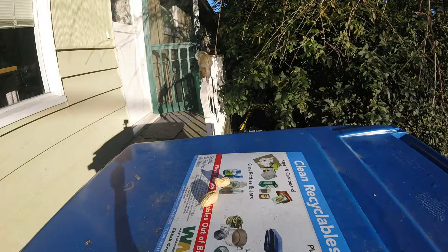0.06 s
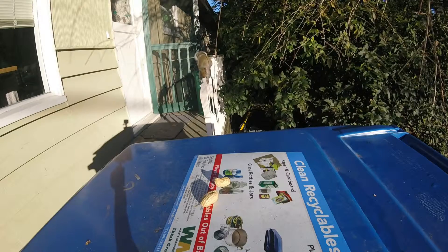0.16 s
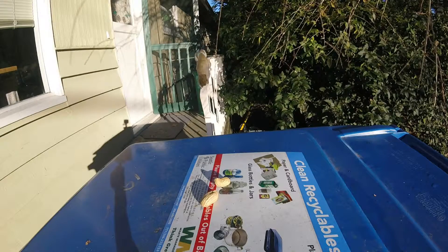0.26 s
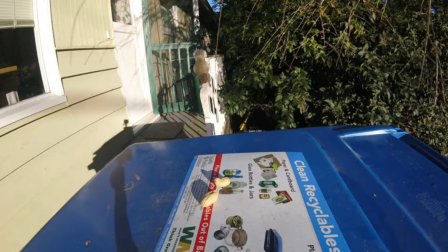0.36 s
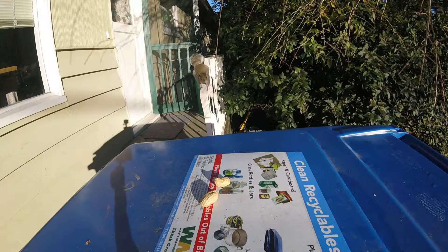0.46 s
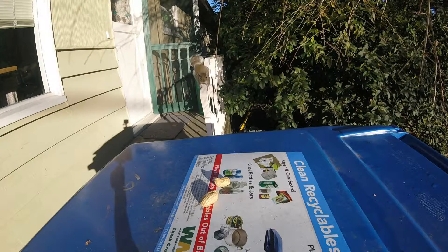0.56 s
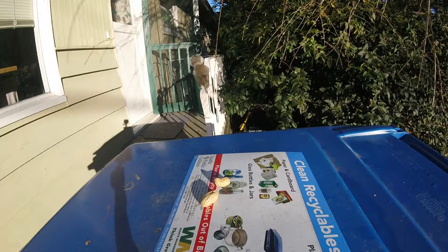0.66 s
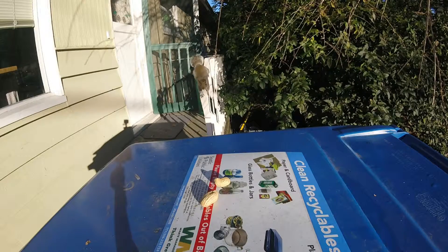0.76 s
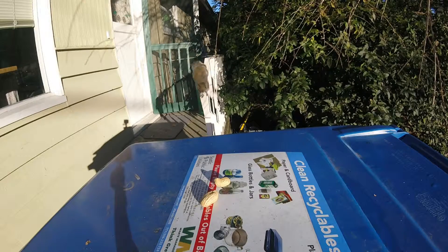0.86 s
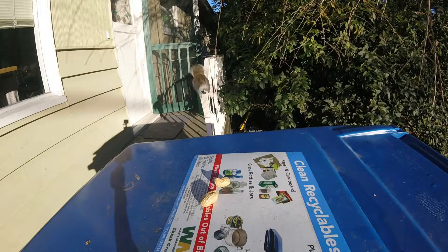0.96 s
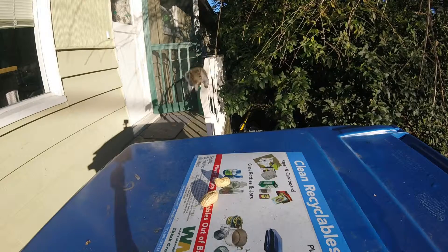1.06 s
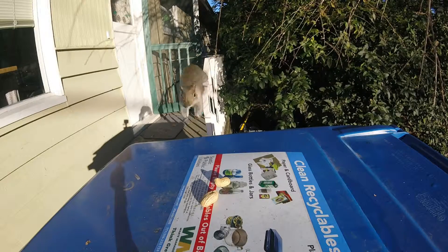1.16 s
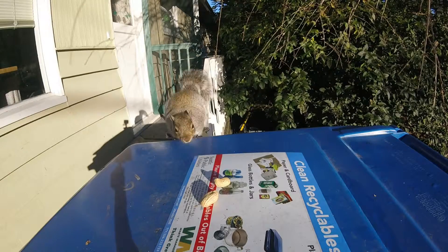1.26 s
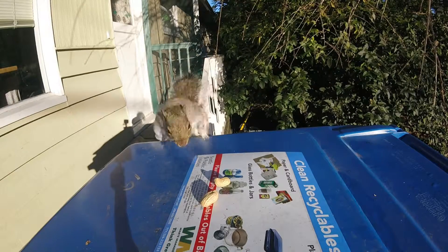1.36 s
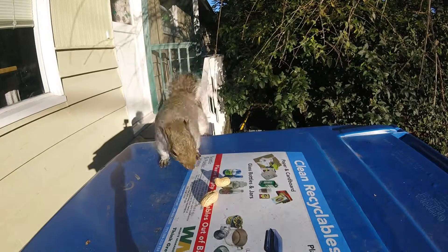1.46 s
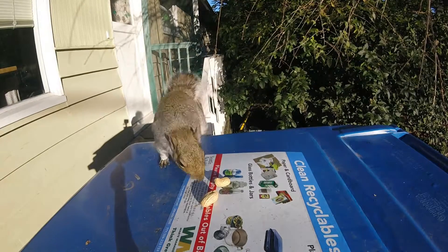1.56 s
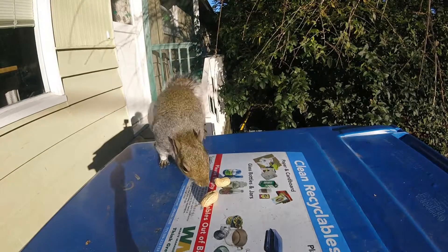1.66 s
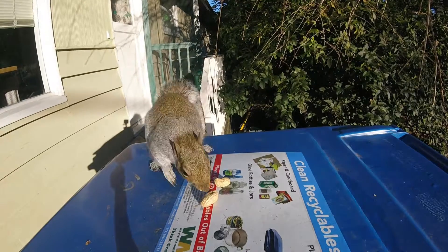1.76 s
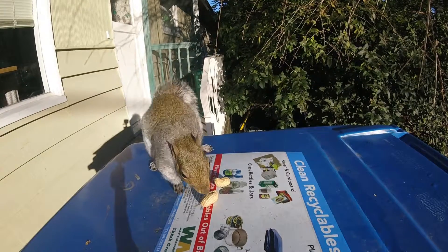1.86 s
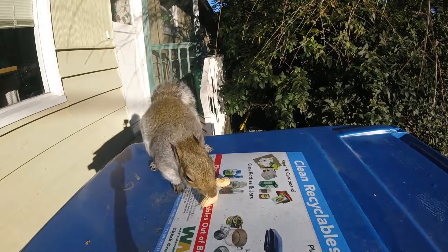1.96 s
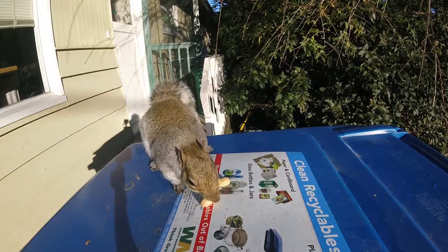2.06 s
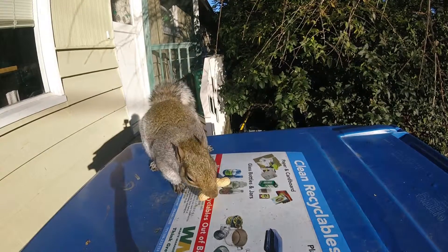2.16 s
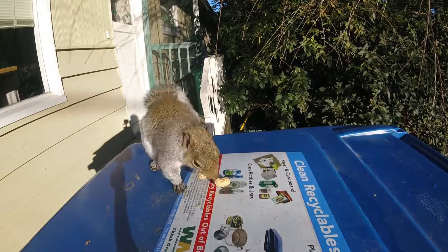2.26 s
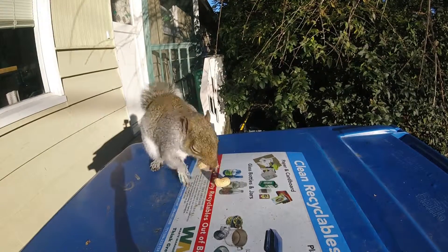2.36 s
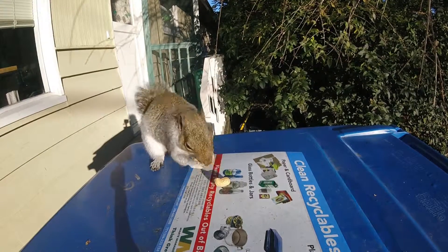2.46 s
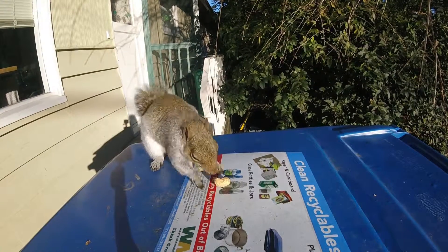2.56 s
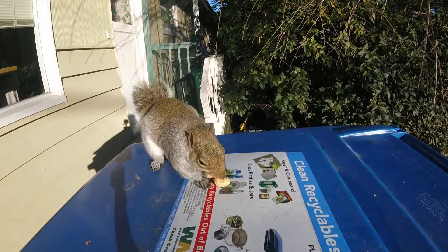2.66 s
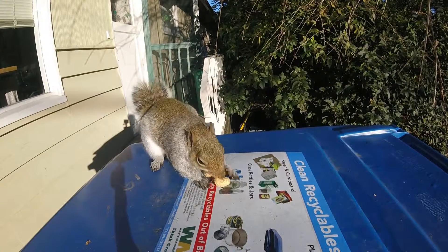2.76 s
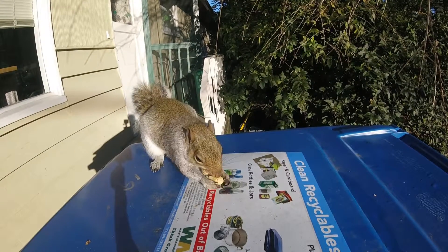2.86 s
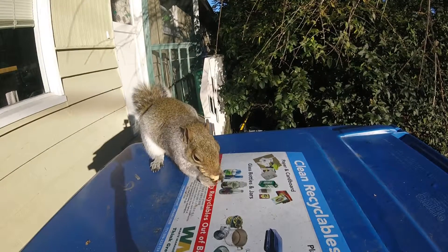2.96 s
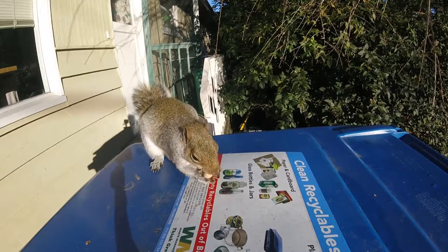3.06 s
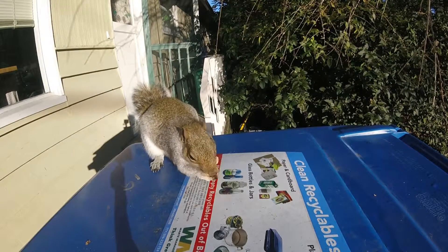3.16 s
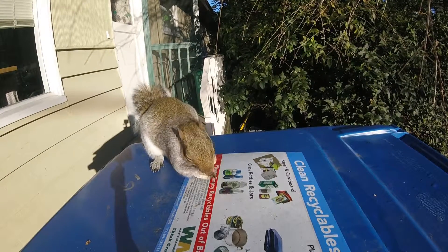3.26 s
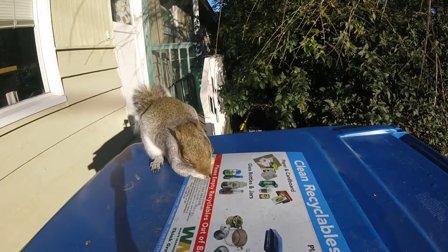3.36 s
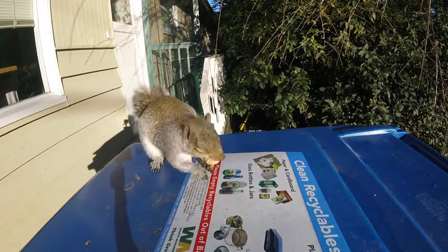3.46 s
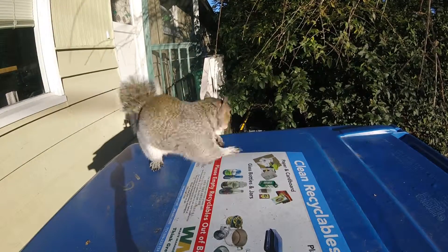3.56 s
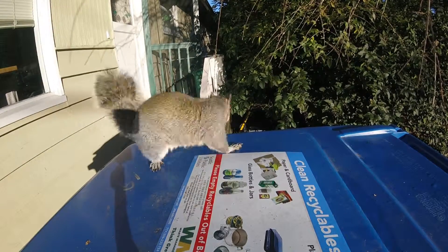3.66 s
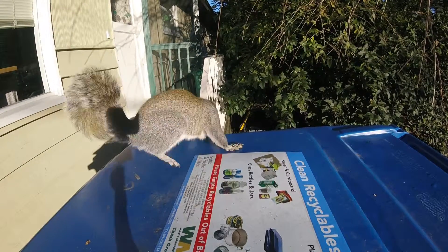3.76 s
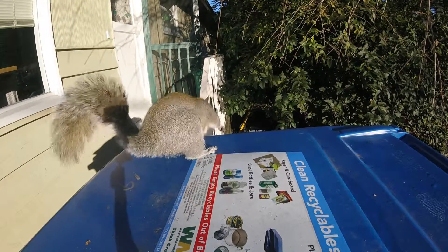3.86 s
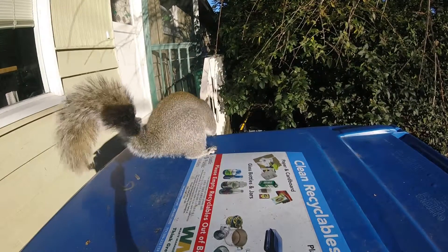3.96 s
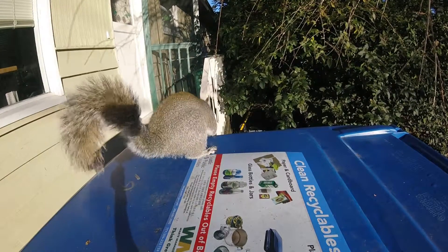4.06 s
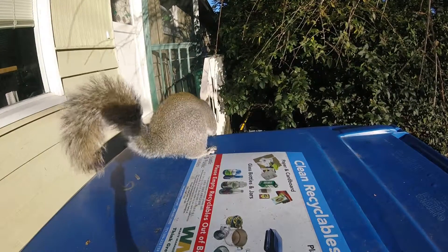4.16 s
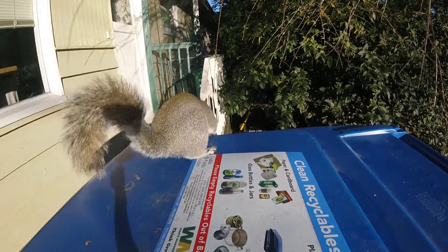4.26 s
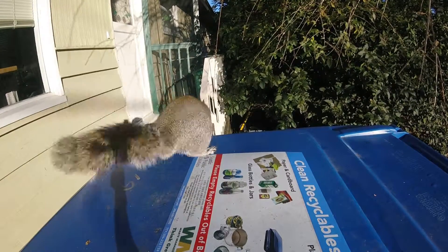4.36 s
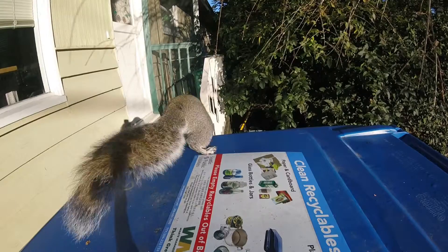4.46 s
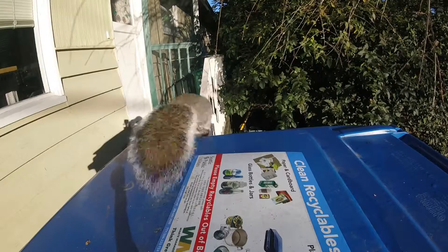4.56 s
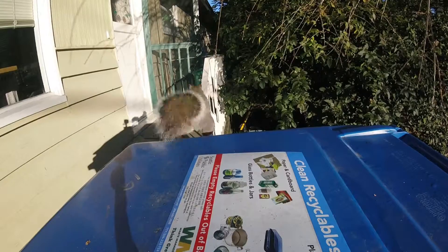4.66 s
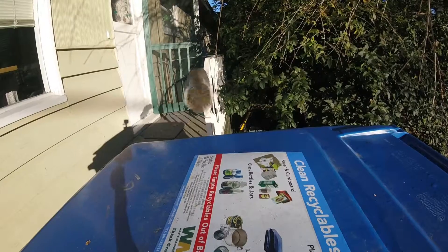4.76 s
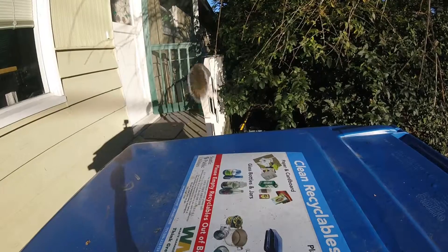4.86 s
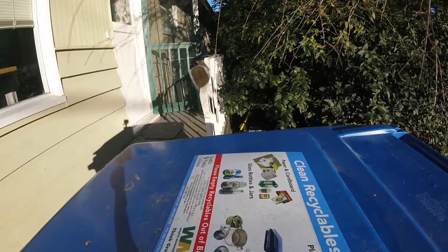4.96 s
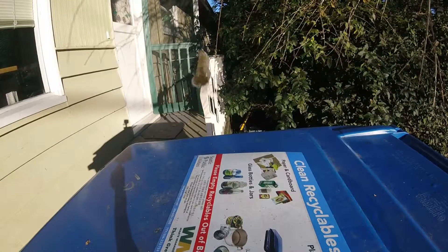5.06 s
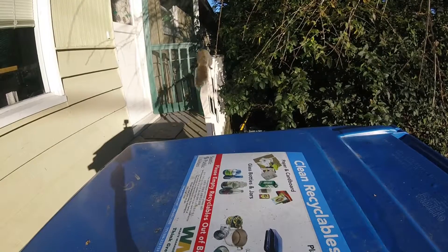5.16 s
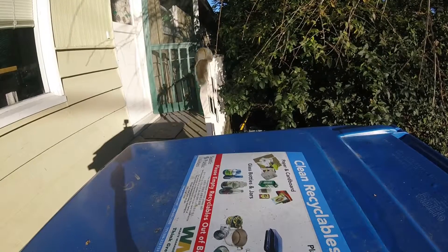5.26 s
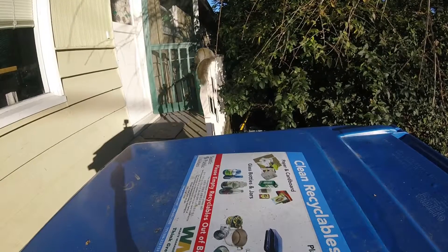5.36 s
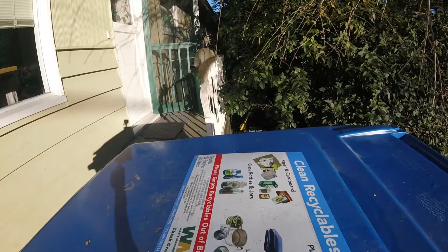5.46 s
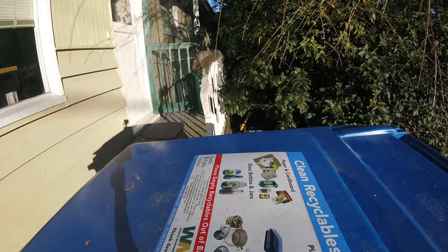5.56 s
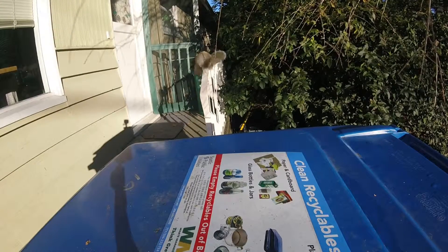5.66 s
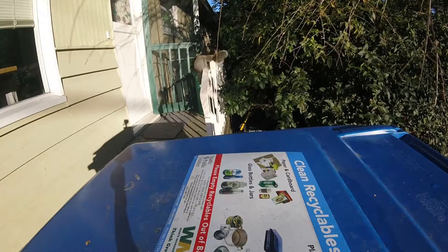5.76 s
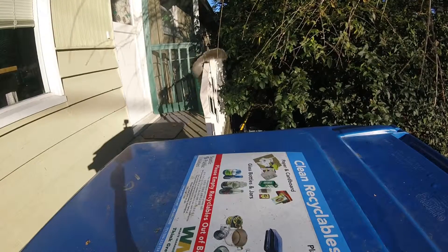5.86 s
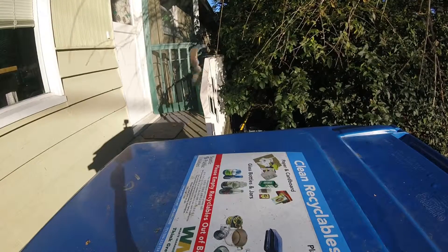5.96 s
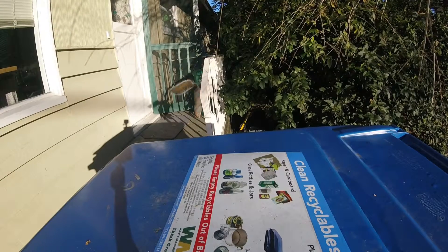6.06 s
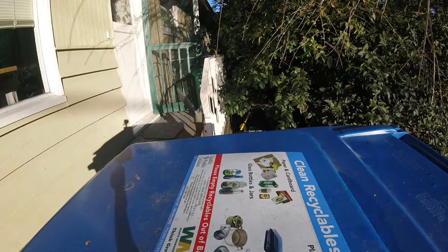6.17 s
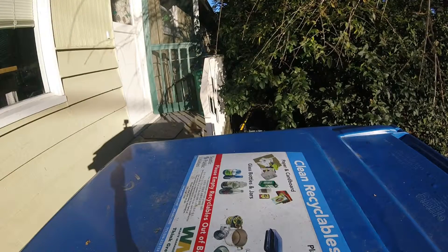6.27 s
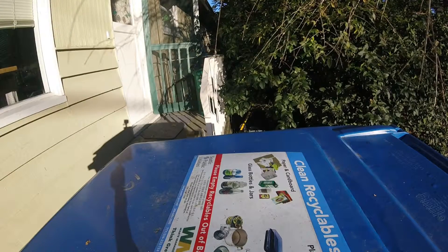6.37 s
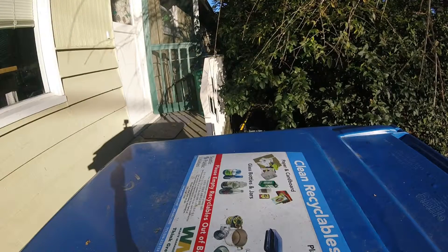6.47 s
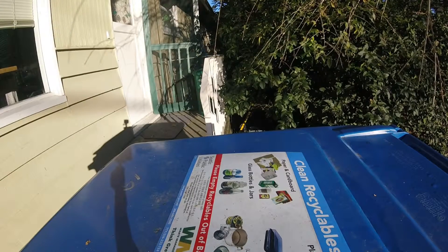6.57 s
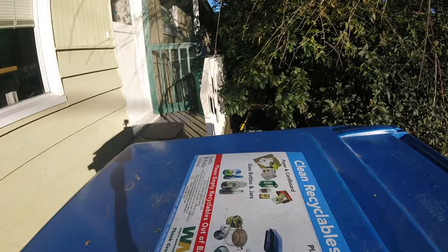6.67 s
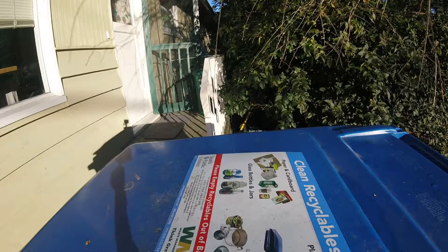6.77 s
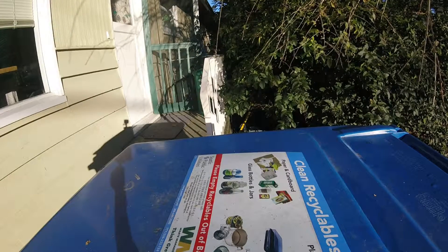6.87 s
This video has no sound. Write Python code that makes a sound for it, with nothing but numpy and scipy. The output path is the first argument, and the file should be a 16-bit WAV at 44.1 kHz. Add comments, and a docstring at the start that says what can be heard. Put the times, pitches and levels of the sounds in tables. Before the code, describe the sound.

Heard from a microphone lying on a plastic bin lid outdoors: dull far-off rumble, then a sudden hard slap that makes the hollow bin ring briefly. Light paws patter, claws tick and scrape, and a nut rattles against the plastic. A middling knock comes midway, then softer steps and a heavy, bassy push-off. Barely audible scratching on a wooden post follows before the yard falls quiet again. The background ducks after the hard landing and slowly recovers.

```python
"""Far town rumble and hiss in a quiet yard, then a squirrel lands hard on the lid of a hollow plastic bin.
It pads about, picks up a nut and leaps off. Footfalls sum claw clacks, slap, flex and heave wave packets,
ringing bin modes and a scattered rattle; taps, rubs and the lid's murmur are shaped noise.
The microphone lies on the lid; its gain control ducks at the hardest blows and creeps back."""
import sys
import numpy as np
from scipy import signal
from scipy.fft import rfft, irfft, next_fast_len
from scipy.io import wavfile
from scipy.ndimage import uniform_filter1d, map_coordinates

SR = 44100
rng = np.random.default_rng(int(sys.argv[2]) if len(sys.argv) > 2 else 0)


def master(y):
    """Save y as 16-bit WAV."""
    cut = np.clip(np.atleast_2d(y).T, -1, 1)
    pcm = np.round(cut * 32767)  # scale
    wavfile.write(sys.argv[1], SR, pcm.astype(np.int16))


N = 304775
TIME_S = np.arange(N) / SR
RING_S = np.arange(SR // 2) / SR  # time axis of one blow


def amp(db):
    """Decibels to gain."""
    return 10 ** (np.asarray(db) / 20)


def unit(x):
    """Scale to rms 1."""
    return x / np.sqrt(np.mean(x ** 2) + 1e-20)


def along(points, hz):
    """Read (Hz, value) points on a log frequency axis."""
    point_hz, value = np.transpose(points)
    return np.interp(np.log(hz + 1), np.log(point_hz), value)


def filtered(x, response):
    """Filter x by a gain given as a function of frequency."""
    size = next_fast_len(len(x) + 8192)  # padded against wrap-around
    gain = response(np.fft.rfftfreq(size, 1 / SR))
    return irfft(rfft(x, size) * gain, size)[:len(x)]


def noise(spectrum, size, tilt_db=0):
    """Noise of rms 1 with a spectrum, tilted by dB per octave."""
    def response(hz):
        return amp(along(spectrum, hz) + tilt_db * np.log2(hz + 1))
    return unit(filtered(rng.standard_normal(size), response))


def wobble(rate_hz):
    """A smooth random curve, rate_hz knots a second."""
    knots = rng.standard_normal(int(N * rate_hz / SR) + 4)
    return map_coordinates(knots, [TIME_S * rate_hz])


def fade(t, t60_s):
    """Exponential decay, 60 dB down at t60_s."""
    return np.exp(-np.log(1000) * t / t60_s)


def add(track, start_s, sound):
    """Mix a sound into the track at start_s."""
    part = track[round(start_s * SR):][:len(sound)]
    part += sound[:len(part)]


# Distant town rumble spectrum. Each row: frequency in Hz, relative density in dB per Hz.
TOWN_SPECTRUM = [(15, -5), (30, -8.5), (52, 8), (80, -5), (110, 1.5), (155, -7.5), (260, -8), (400, -9.5),
                 (900, -10.5), (1250, -21.5), (1800, -28.5), (2900, -32), (4000, -41.5), (8000, -63.5)]
# Microphone hiss spectrum. Each row: frequency in Hz, relative density in dB per Hz.
HISS_SPECTRUM = [(2500, -27), (4200, -9.5), (5200, -2), (6700, -1), (8500, -4.5), (10500, -12),
                 (13000, -16.5), (14000, -21.5)]
TOWN_DB, TOWN_SWELL_DB, HISS_DB = -48.5, 0.7, -71


def yard():
    """A far town rumble, its level swelling slowly at random, under steady microphone hiss."""
    town = amp(TOWN_DB + TOWN_SWELL_DB * wobble(3.12)) * noise(TOWN_SPECTRUM, N)
    return town + amp(HISS_DB) * noise(HISS_SPECTRUM, N)


# Lid murmur from landing to settling. Each row: time in seconds, level in dB before MURMUR_DB.
SHIFT_LEVELS = [(1.3, -46), (1.47, -44), (1.62, -44), (1.93, -55), (2.05, -56), (2.28, -49), (2.58, -45.5),
                (3.06, -46), (3.45, -49.5), (3.88, -37.5), (4.13, -62), (4.41, -52), (4.68, -42.5),
                (4.86, -38), (5.11, -50.5), (5.4, -73)]
# Murmur spectrum. Each row: frequency in Hz, relative density in dB per Hz.
SWAY_SPECTRUM = [(20, -24), (40, 8), (60, 7), (85, -1), (120, -2), (150, -0.5), (240, -6.5), (330, -21.5),
                 (600, -27), (1200, -40), (2500, -78)]
MURMUR_DB, MURMUR_WOBBLE_DB = 5.5, 1.3


def shifting():
    """Small shifts of weight keep the lid murmuring between the steps, as low noise."""
    level_db = np.interp(TIME_S, *np.transpose(SHIFT_LEVELS), left=-np.inf, right=-np.inf)
    level_db = MURMUR_DB + level_db + MURMUR_WOBBLE_DB * wobble(20)
    return amp(level_db) * noise(SWAY_SPECTRUM, N)


def strokes(rows, half_s, spectrum, grain_db, grain_rate_hz):
    """Brief rubs that catch and slip in tiny grains: bell-shaped bursts of roughened noise."""
    pressure = sum(amp(db) * np.exp(-.5 * ((TIME_S - mid_s) / half_s) ** 2) for mid_s, db in rows)
    grains = unit(amp(grain_db * wobble(grain_rate_hz)))
    return pressure * grains * noise(spectrum, N)


# Nut jiggling on the lid. Each row: middle in seconds, level in dB.
NUT_RUBS = [(2.92, -34), (3.51, -49.5)]
# Nutshell spectrum. Each row: frequency in Hz, relative density in dB per Hz.
SHELL_SPECTRUM = [(150, -4), (400, -1), (620, -7), (800, 3.5), (950, -21), (1150, 0), (1400, -36),
                  (3000, -49), (7000, -57.5)]


def nut():
    """The shell chatters against the sheet while the squirrel gets a grip on it."""
    return strokes(NUT_RUBS, 0.016, SHELL_SPECTRUM, grain_db=6, grain_rate_hz=130)


# Claw crack spectrum before tilt. Each row: frequency in Hz, relative density in dB per Hz.
CLAW_SPECTRUM = [(600, -36), (1500, 19), (2600, 9.5), (3800, 2), (5200, 7), (6200, 1), (7000, -14),
                 (10000, -19), (14000, -40.5)]
TICK_ATTACK_S = 0.00064
TICK_T60_S, TICK_LENGTHENS = 0.057, 0.22  # decay of a 0 dB tap; dB of decay time per dB


def tick(db, bright_db):
    """A brief crack of claw-coloured noise; a harder one lasts longer."""
    t = RING_S[:SR // 8]
    attack = 1 - np.exp(-(t / TICK_ATTACK_S) ** 2)
    shape = attack * fade(t, TICK_T60_S * amp(TICK_LENGTHENS * db))
    crack = unit(noise(CLAW_SPECTRUM, len(t), bright_db) * shape)
    return amp(db) * crack * np.sqrt(np.mean(shape ** 2))


# Taps of claw and nutshell. Each row: start in seconds, level in dB, brightness in dB per octave.
TAPS = [(1.281, -21, -3), (1.292, -43.5, 2), (1.496, -41, 3.5), (2.102, -43.5, 6.5), (2.165, -45, -17),
        (2.2995, -49.5, 6), (2.9621, -41.5, -2), (3.134, -45, -3), (3.1444, -44, 8), (3.275, -53, 7),
        (3.428, -48, -2), (3.4379, -45, 2), (3.463, -53, -1), (3.579, -47.5, -3), (3.909, -47.5, 20.5),
        (3.9476, -50.5, 8), (4.209, -52.5, 4.5), (4.596, -45, 8), (4.7628, -46.5, 1), (4.8264, -46, -0.5)]
# Claws dragging on the lid. Each row: middle in seconds, level in dB.
DRAGS = [(1.312, -56.5), (1.417, -60), (1.718, -53.5), (1.794, -56.5), (2.645, -64.5), (2.913, -58),
         (2.953, -58), (3.33, -62), (3.55, -64.5), (3.835, -56), (4.60, -63), (4.693, -67), (4.802, -58.5)]
# Drag spectrum. Each row: frequency in Hz, relative density in dB per Hz.
DRAG_SPECTRUM = [(1500, -8.5), (2700, -2), (3800, -7.5), (5200, 1), (6200, -1), (7000, -14), (10000, -22),
                 (14000, -38)]
# Claws on the wooden post, further off. Each row: middle in seconds, level in dB.
POST_SCUFFS = [(4.968, -67), (5.245, -73), (5.29, -74)]
# Post spectrum. Each row: frequency in Hz, relative density in dB per Hz.
POST_SPECTRUM = [(1500, -17), (3000, -5), (3900, 11), (4700, 9), (6000, -6), (9000, -17)]


def claws():
    """Claws and shell tick on the lid, claws drag across it, and later climb the post."""
    out = np.zeros(N)
    for start_s, db, bright_db in TAPS:
        add(out, start_s, tick(db, bright_db))
    drag = strokes(DRAGS, 0.013, DRAG_SPECTRUM, grain_db=6, grain_rate_hz=600)
    climb = strokes(POST_SCUFFS, 0.016, POST_SPECTRUM, grain_db=3.5, grain_rate_hz=250)
    return out + drag + climb


def bend(hz, rise_s, steep, sag):
    """A packet of bending waves: it swells, passes and sinks in pitch, since short waves travel faster."""
    u = RING_S / rise_s
    pitch_hz = hz * (1 + sag * np.tanh(1 - u))
    turns = np.cumsum(pitch_hz) / SR
    turns_at_peak = np.interp(rise_s, RING_S, turns)
    envelope = (u * np.exp(1 - u)) ** steep
    return envelope * np.cos(2 * np.pi * (turns - turns_at_peak))


# Modes of lid and bin. Each row: frequency in Hz, level in dB relative to the push, t60 in seconds.
BIN_MODES = [(62.55, -7, 0.59), (122.1, -8.5, 0.38), (179.2, -8.5, 0.31), (224.5, -8, 0.31),
             (258.3, -6, 0.2), (328.2, -18.5, 0.12), (433, -22.5, 0.12), (463, -20.5, .16),
             (485.5, -26.5, 0.3), (578, -32, 0.26), (747, -24.5, 0.053), (820, 0.5, 0.018),
             (1063, -32.5, 0.059), (1230, -28, 0.033)]
# The sheet's crowded higher modes. Each row: frequency in Hz, relative density in dB per Hz.
RATTLE_SPECTRUM = [(100, -13.5), (300, -5), (600, -1), (1100, -9.5), (1500, -20.5), (2200, -31.5),
                   (3500, -37.5), (6000, -48.5), (7200, -61.5), (14000, -78.5)]
# Rattle decay. Each row: frequency in Hz, t60 in seconds.
RATTLE_T60 = [(250, 0.27), (600, 0.12), (1200, 0.072), (3000, 0.067), (8000, 0.021)]


def rattle(tilt_db, rise_s, hollow_db, width):
    """Waves scatter between the ribs of the lid, strongest near its modes; the treble dies first."""
    def near_modes(f):
        return np.max([1 / (1 + ((f - hz) / (width * hz)) ** 2) for hz, _, _ in BIN_MODES], axis=0)
    sheet = noise(RATTLE_SPECTRUM, len(RING_S), tilt_db)
    waves = unit(filtered(sheet, lambda f: amp(hollow_db * near_modes(f))))
    hz, t, bands = signal.stft(waves, SR, nperseg=256)
    decayed = bands * fade(t, along(RATTLE_T60, hz)[:, None])
    tail = signal.istft(decayed, SR, nperseg=256)[1][:len(RING_S)]
    return tail * (1 - np.exp(-RING_S / rise_s))


def ring(push, scatter_db, swell_cycles, wander):
    """The bin's modes build up over a few cycles, each as strongly as the blow pushes at its pitch."""
    out = np.zeros(len(RING_S))
    for hz, db, t60_s in BIN_MODES:
        t = RING_S[RING_S < t60_s]
        level = amp(db + along(push, hz) + scatter_db * rng.standard_normal())
        swell = 1 - np.exp(-(t * hz / swell_cycles) ** 2)
        # the loose lid and the moving load let the phase stray, so no mode rings true
        stray = np.cumsum(rng.standard_normal(size=32)) * wander
        drift = np.interp(t, np.linspace(0, RING_S[-1], len(stray)), stray)
        wave = np.sin(2 * np.pi * (hz * t + drift + rng.random()))
        out[:len(t)] += level * swell * fade(t, t60_s) * wave
    return out


CLACK_HZ = 1142
CRACK_DB, CRACK_TILT_DB, CRACK_DELAY_S = -17.5, -9.5, 0.00063  # relative to clack; dB per octave
# a harder paw slaps higher and rattles the sheet sooner and more brightly
PLAIN_SLAP_HZ = 674
CONTACT_S, CONTACT_SHORTENS = 0.0029, 1.8  # rattle rise; halvings of it per octave of slap pitch
RATTLE_TILT_DB = 8  # dB per octave of treble, for each octave of slap pitch
RATTLE_DB, RATTLE_SLOPE = -6.5, 0.78  # under a slap of 0 dB; dB per dB of slap
# the deeper the lid gives, the later it bottoms out
FLEX_RISE_S, FLEX_SINK_S = 0.01144, 0.0049  # a light step; added by a flex of 0 dB
HEAVE_RISE_S, HEAVE_SLOPE = 0.0297, 0.079  # a heave of 0 dB; dB of rise time per dB


def footfall(clack_db, slap_db, slap_hz, flex_db, flex_hz, heave_db, heave_hz):
    """First the claws' clack and the local slap, then the panel's flex, last the heave of the whole lid."""
    hardness_oct = np.log2(slap_hz / PLAIN_SLAP_HZ)
    contact_s = CONTACT_S * 2 ** (-CONTACT_SHORTENS * hardness_oct)
    clack = amp(clack_db) * bend(CLACK_HZ, rise_s=0.002325, steep=2.0, sag=0.22)
    add(clack, CRACK_DELAY_S, tick(clack_db + CRACK_DB, CRACK_TILT_DB))
    slap = amp(slap_db) * bend(slap_hz, rise_s=0.00608, steep=6.9, sag=0.03)
    flex_rise_s = FLEX_RISE_S + FLEX_SINK_S * amp(flex_db)
    flex = amp(flex_db) * bend(flex_hz, flex_rise_s, steep=3.9, sag=0.1)
    heave_rise_s = HEAVE_RISE_S * amp(HEAVE_SLOPE * heave_db)
    heave = amp(heave_db) * bend(heave_hz, heave_rise_s, steep=8.2, sag=0.12)
    push = [(heave_hz, heave_db), (flex_hz, flex_db), (slap_hz, slap_db)]
    body = ring(push, scatter_db=1.0, swell_cycles=4.66, wander=0.1)
    sheet = rattle(RATTLE_TILT_DB * hardness_oct, contact_s, hollow_db=7.5, width=0.012)
    sheet *= amp(RATTLE_DB + RATTLE_SLOPE * slap_db)
    return clack + slap + flex + heave + body + sheet


# One faint bump before scatter. Its values: claw clack in dB, slap in dB, slap in Hz, flex in dB,
# flex in Hz, heave in dB, heave in Hz.
FAINT_BUMP = (-65, -49.5, 513, -34.5, 250, -49, 88)
BUMPS_FROM_S, BUMPS_TO_S, BUMP_SCATTER_DB = 3.0, 5.2, 3


def faint_bumps(count):
    """Faint, unevenly spaced bumps of the lid, each a blow of random level."""
    out = np.zeros(N)
    gap_s = (BUMPS_TO_S - BUMPS_FROM_S) / count
    for k in range(count):
        start_s = BUMPS_FROM_S + gap_s * (k + rng.random())
        level = amp(BUMP_SCATTER_DB * rng.standard_normal())
        add(out, start_s, level * footfall(*FAINT_BUMP))
    return out


# Footfalls on the lid. Each row: start in seconds, claw clack in dB, slap in dB, slap in Hz,
# flex in dB, flex in Hz, heave in dB, heave in Hz.
FOOTFALLS = [(1.281, -8.5, -3, 823, 1.5, 244.7, -11.5, 84), (1.373, -28, -26.5, 735, -21, 219, -20, 67),
             (1.497, -27.5, -9, 533, -15, 232, -19, 132), (1.508, -42, -15, 554, -15, 340, -23.5, 126.6),
             (1.787, -22.5, -12, 590, -10, 210.5, -18.5, 62.6),
             (1.799, -27, -18, 605, -13.5, 247, -20.5, 165), (1.894, -45, -47, 493, -20, 251, -20, 73),
             (1.901, -43.5, -18, 433, -14, 241, -34.5, 110), (2.161, -58, -36, 620, -60, 234, -56, 76),
             (2.374, -60, -47.5, 470, -38, 250, -29, 71.4), (2.617, -55, -41, 500, -36.5, 240, -35, 80.6),
             (2.676, -46.5, -24, 431, -21, 246, -25, 88), (2.879, -49, -47.5, 804, -37, 230, -51, 85),
             (2.917, -30, -27, 783, -23, 231, -30.5, 89), (2.958, -58, -33, 674, -27.5, 256, -38, 86),
             (3.143, -29, -29.5, 797, -25.5, 240, -26.5, 92.5), (3.38, -64, -44, 500, -35.5, 238, -53, 85),
             (3.686, -37, -25.5, 520, -21, 297, -24.5, 101), (3.813, -55, -32, 503, -31, 234, -23.5, 73),
             (3.904, -17.5, -12, 567, -7, 179.3, -12.5, 117), (3.930, -51, -39, 460, -23, 236, -19, 127.6),
             (4.001, -56, -49.5, 560, -48, 229, -24.5, 115),
             (4.460, -55.5, -39, 490, -37.5, 240, -23, 73.4),
             (4.536, -33.5, -26.5, 622, -23.5, 236, -16, 77),
             (4.596, -47, -50, 830, -33.5, 229, -31.5, 111), (4.647, -69.5, -44, 481, -34, 238, -26, 80),
             (4.689, -44.5, -14.5, 520, -28, 236, -9, 81),
             (4.738, -49, -44.5, 593, -29.5, 239, -20.5, 71.6), (4.795, -41.5, -23, 490, -10.5, 236, 0, 67)]


def paws():
    """The squirrel lands, pads about and leaps off; each paw strikes the lid as one footfall."""
    out = np.zeros(N)
    for start_s, *blow in FOOTFALLS:
        add(out, start_s, footfall(*blow))
    return out


def scene():
    """Everything reaches one microphone on the lid."""
    background = yard() + shifting()
    squirrel = nut() + claws() + paws()
    return (background + faint_bumps(count=5) + squirrel)[None]


def gain_control(x, ceiling_db, recover_s, ahead_s):
    """The gain drops just ahead of any blow louder than the ceiling and recovers slowly."""
    power = np.abs(uniform_filter1d(x ** 2, size=SR // 60))
    over_db = np.maximum(10 * np.log10(power + 1e-12) - ceiling_db, 0)
    leak = np.exp(-TIME_S / recover_s)
    cut_db = np.maximum.accumulate(over_db / leak) * leak  # peak hold that leaks away
    early_db = np.interp(TIME_S + ahead_s, TIME_S, cut_db)
    return x * amp(-uniform_filter1d(early_db, size=SR // 100))


BASS_CUT_HZ, TOP_HZ = 40, 13950


def record(dry):
    """Gain control, a bass cut and a sharp upper band limit."""
    held = gain_control(dry[0], ceiling_db=-10.0, recover_s=2.19, ahead_s=0.048)
    thin = filtered(held, lambda hz: hz / np.hypot(hz, BASS_CUT_HZ))
    return filtered(thin, lambda hz: hz < TOP_HZ)[None]


dry = scene()
out = record(dry)
master(out)
```